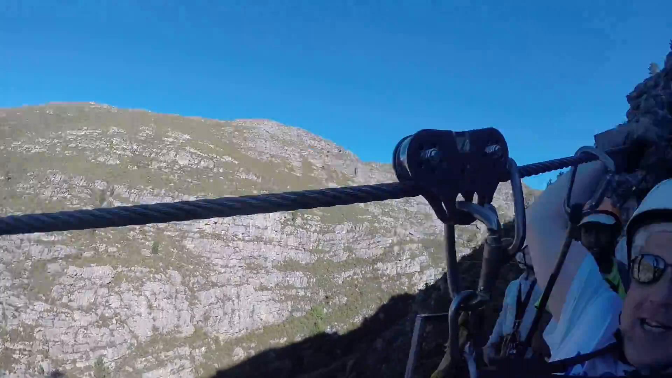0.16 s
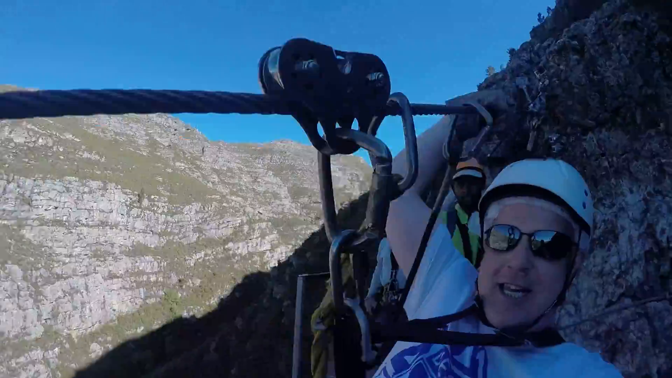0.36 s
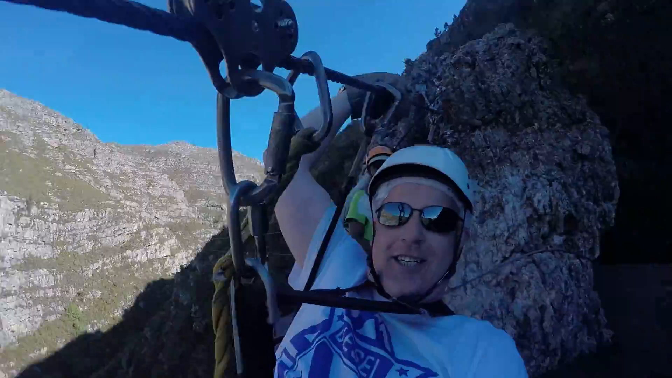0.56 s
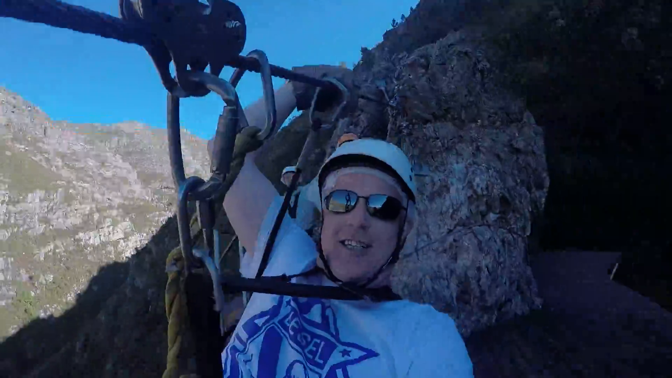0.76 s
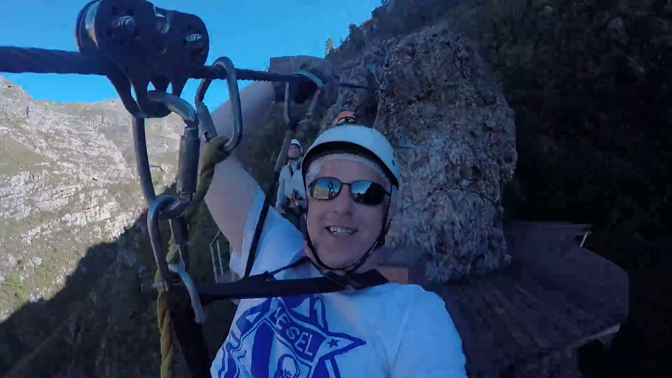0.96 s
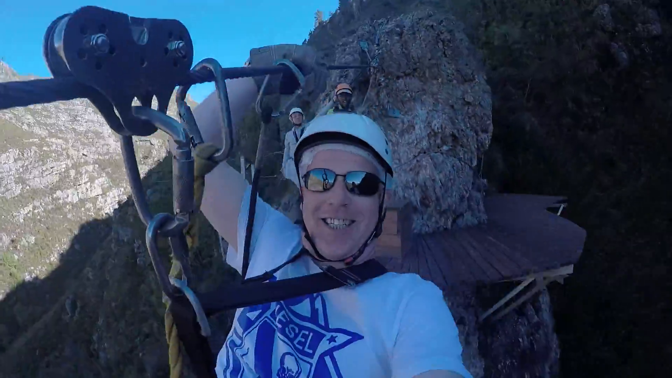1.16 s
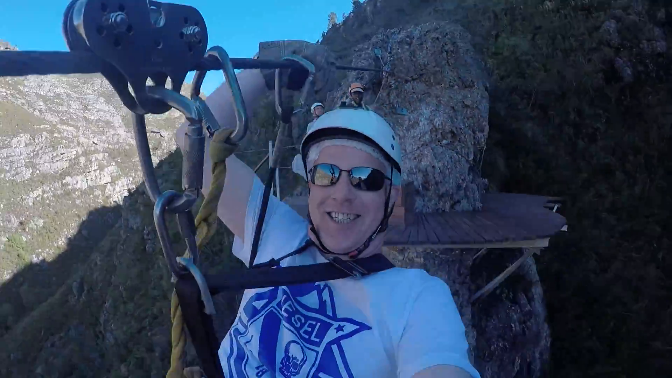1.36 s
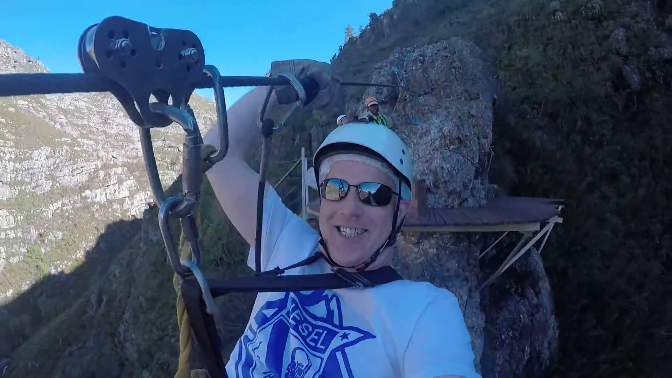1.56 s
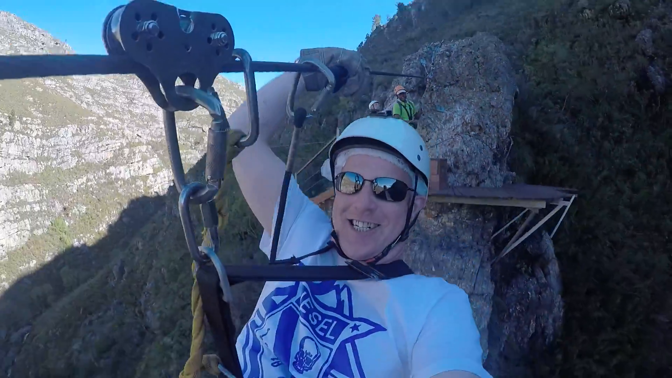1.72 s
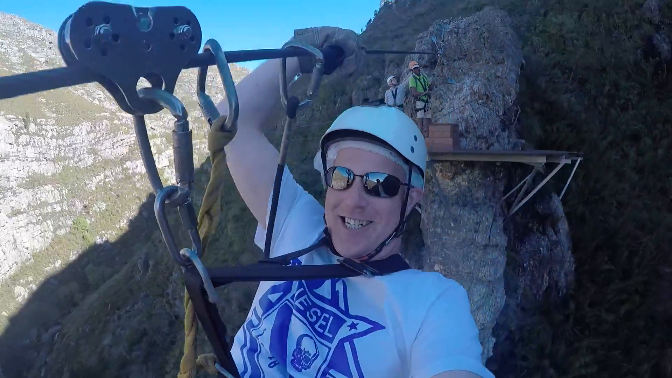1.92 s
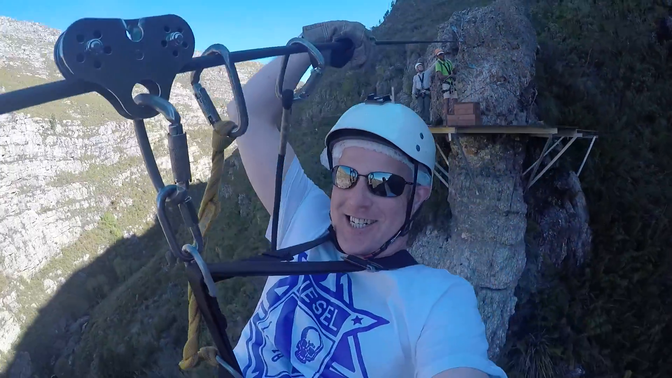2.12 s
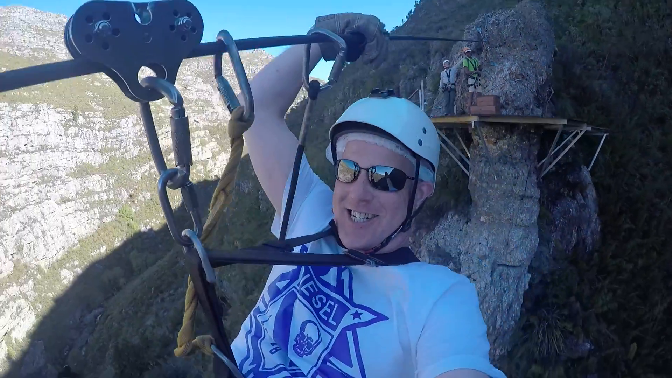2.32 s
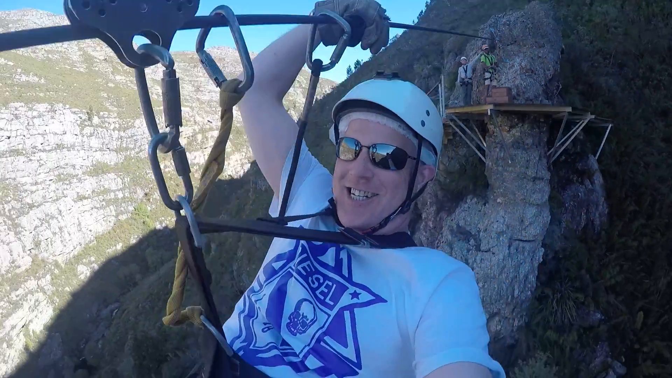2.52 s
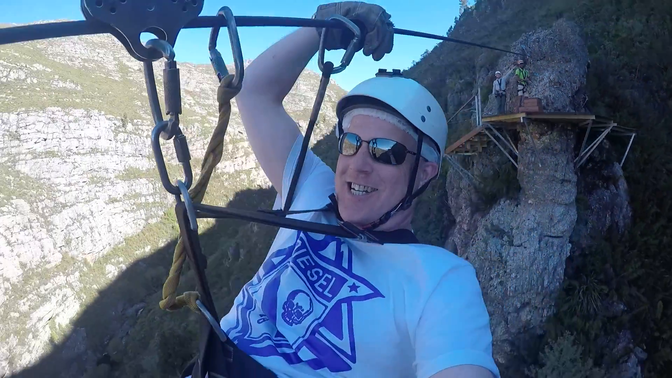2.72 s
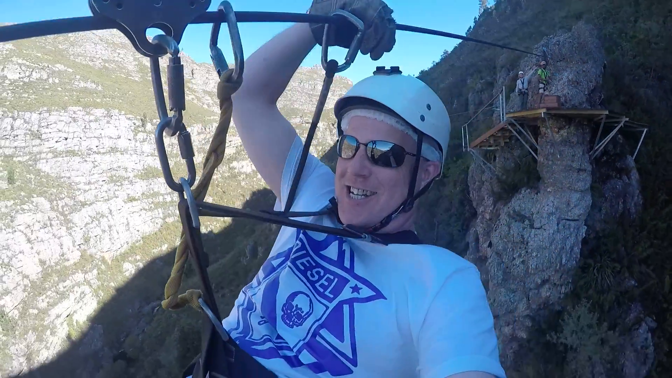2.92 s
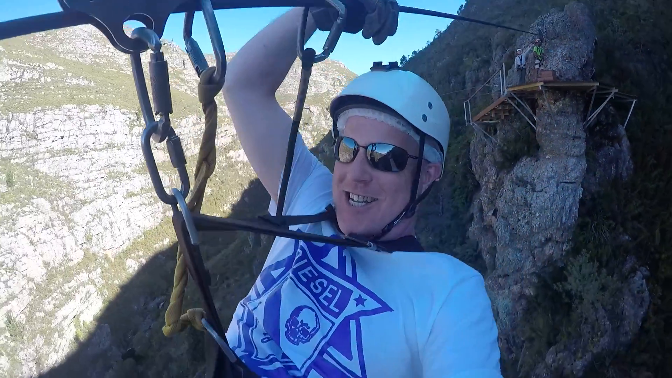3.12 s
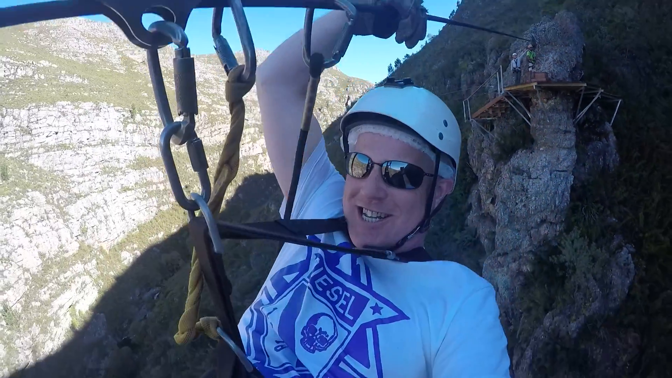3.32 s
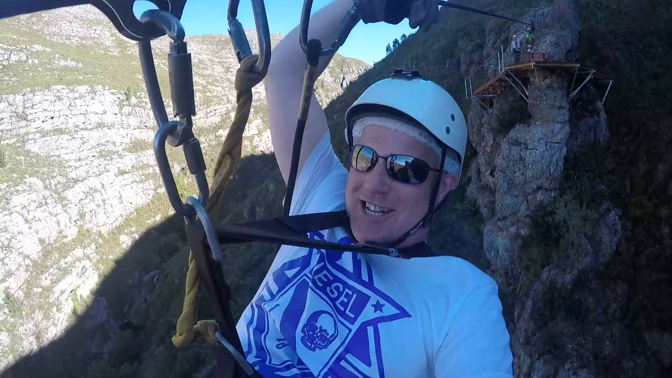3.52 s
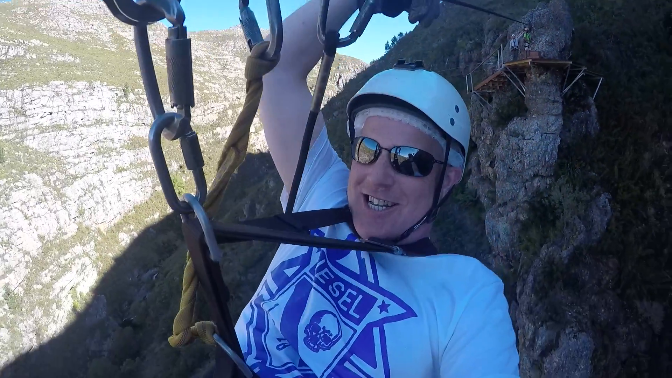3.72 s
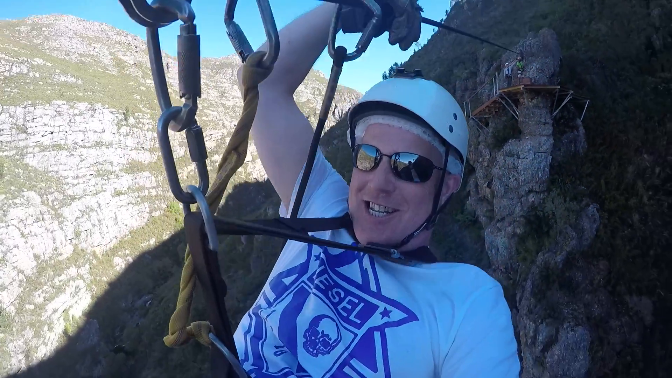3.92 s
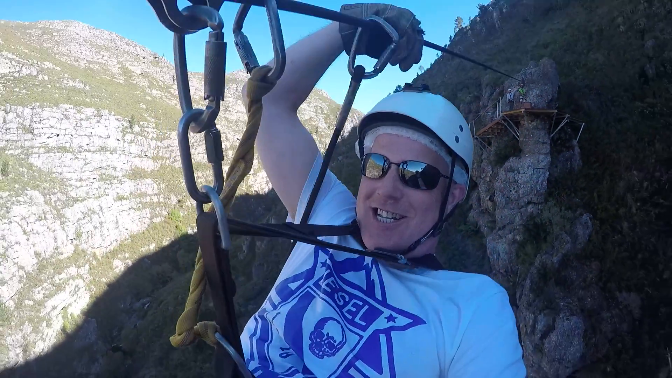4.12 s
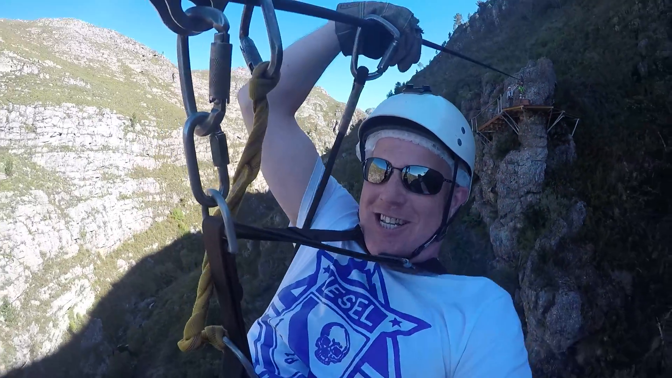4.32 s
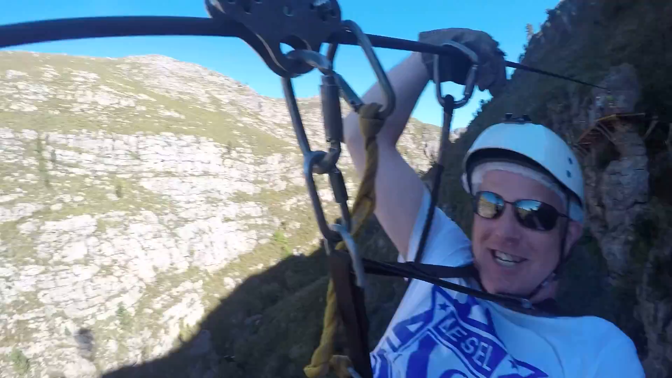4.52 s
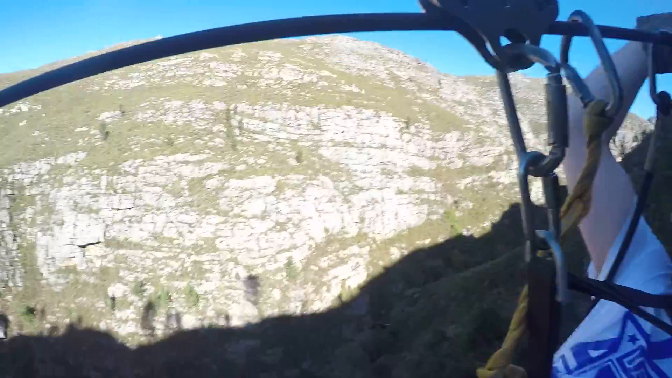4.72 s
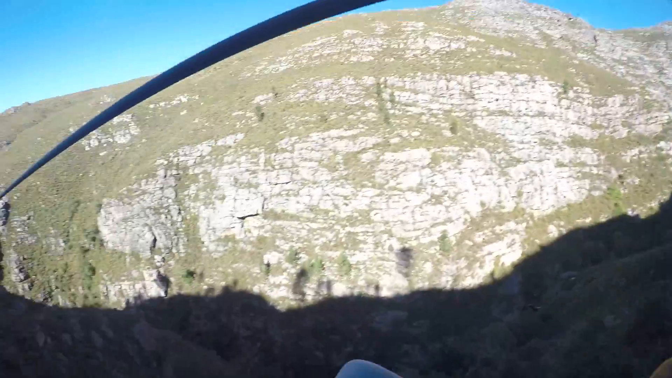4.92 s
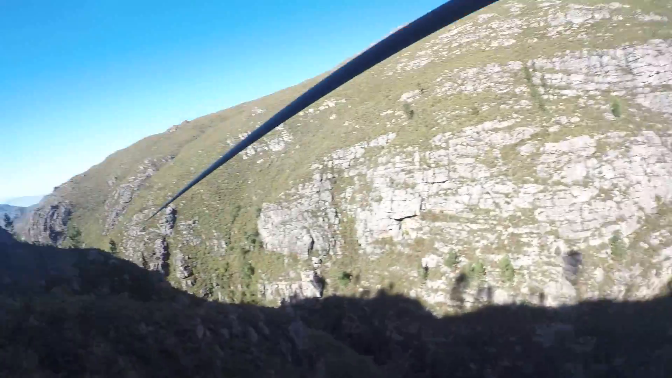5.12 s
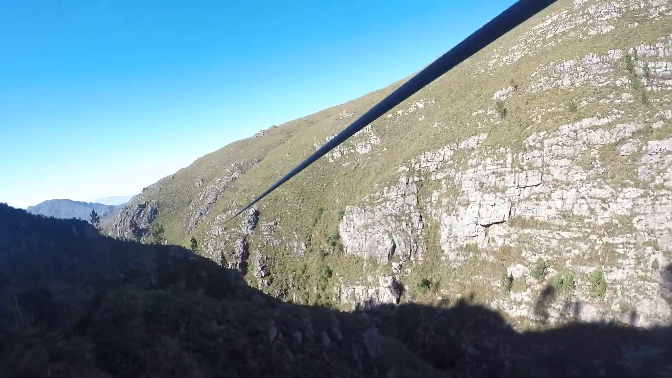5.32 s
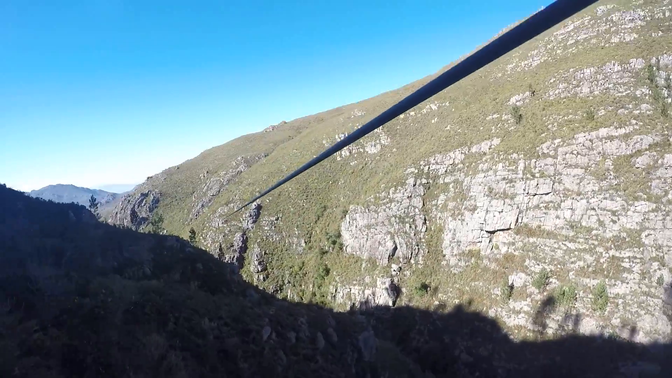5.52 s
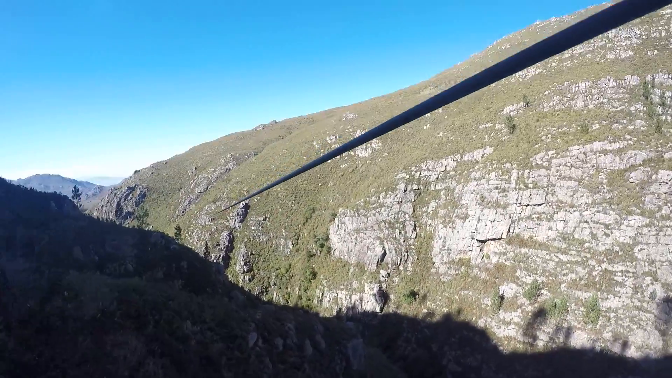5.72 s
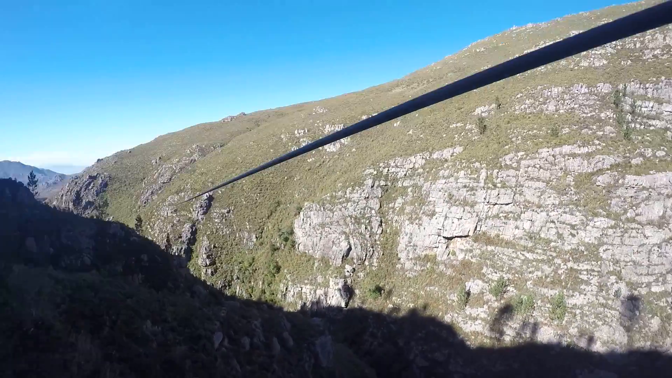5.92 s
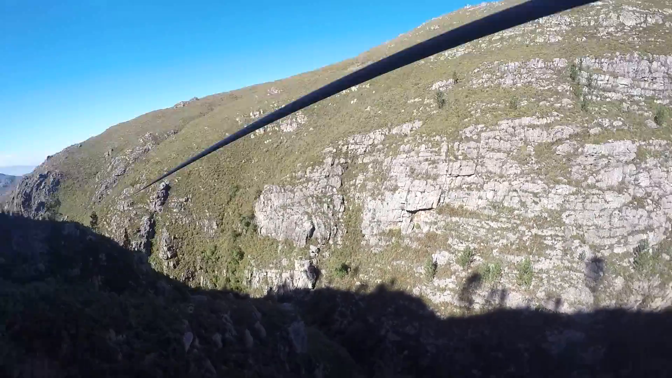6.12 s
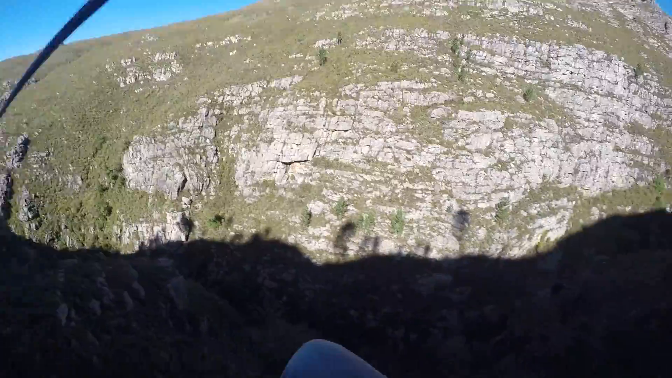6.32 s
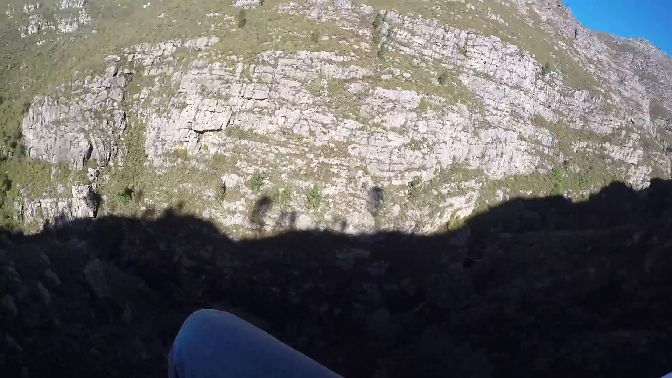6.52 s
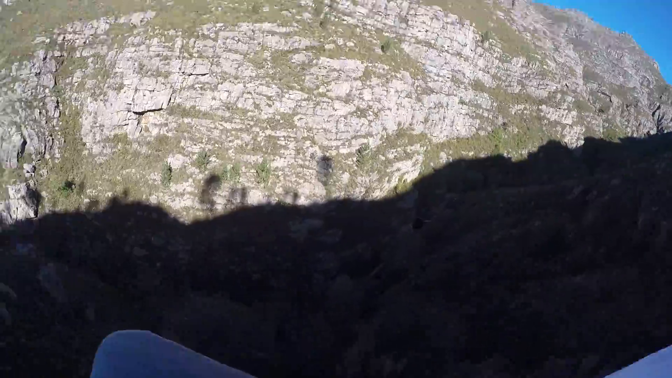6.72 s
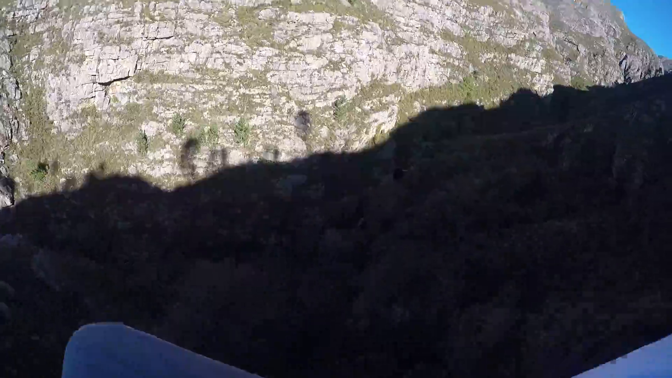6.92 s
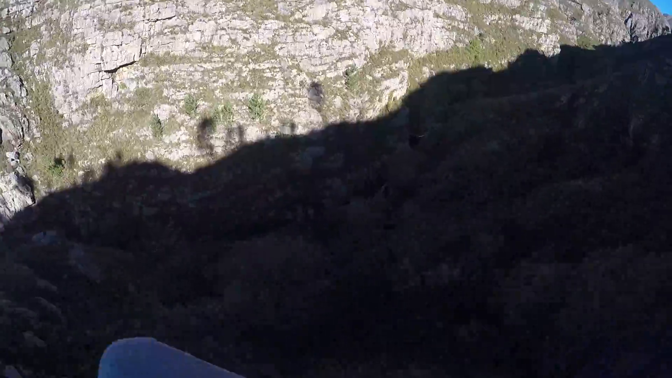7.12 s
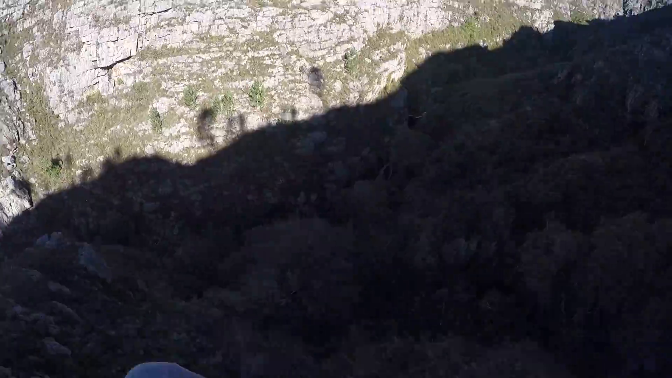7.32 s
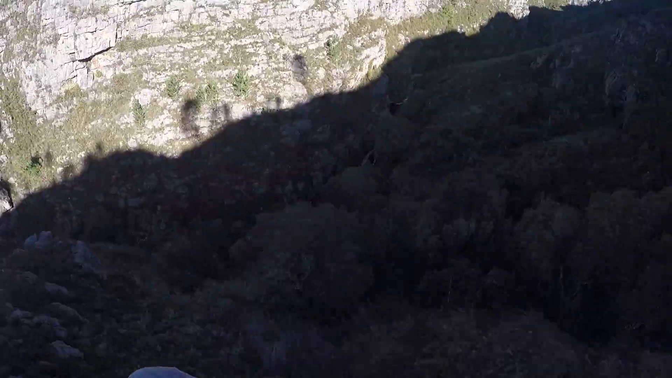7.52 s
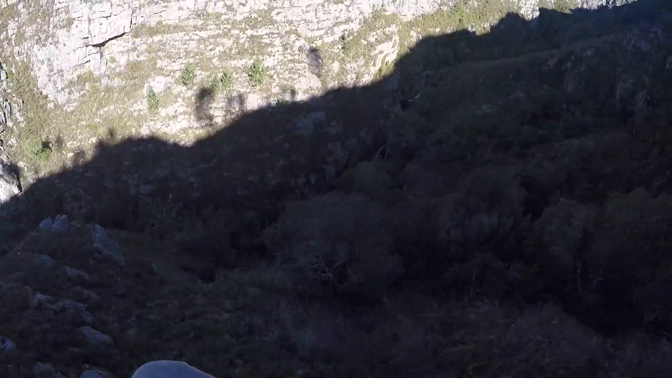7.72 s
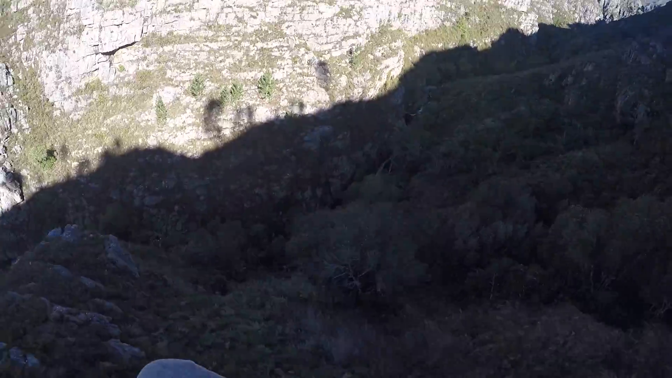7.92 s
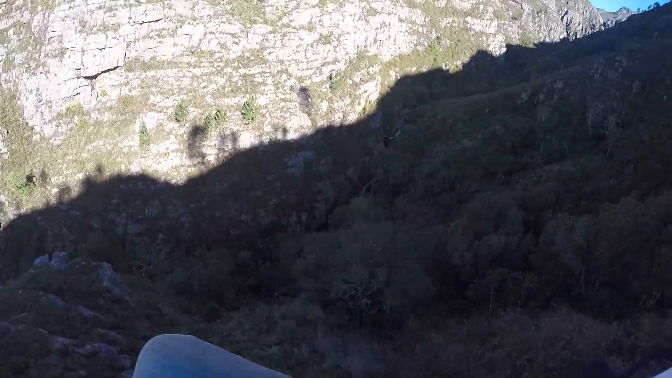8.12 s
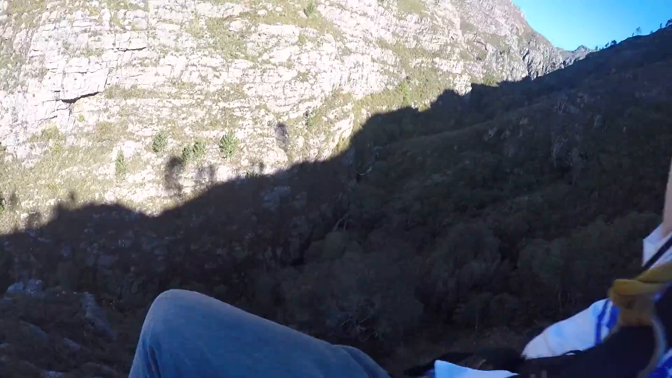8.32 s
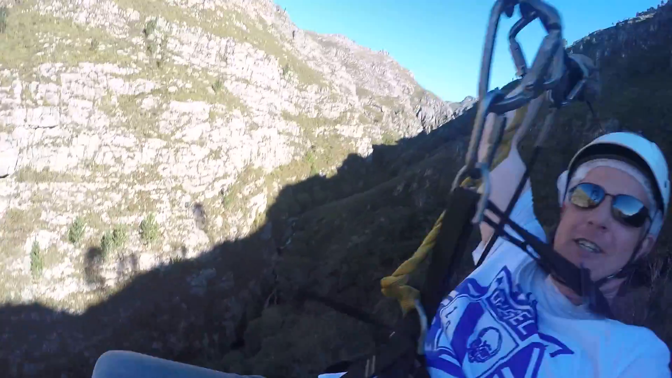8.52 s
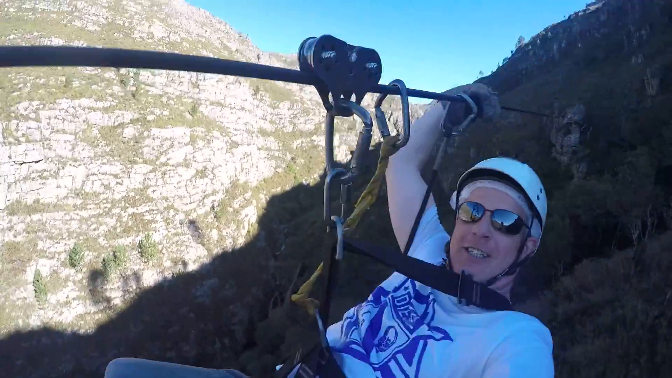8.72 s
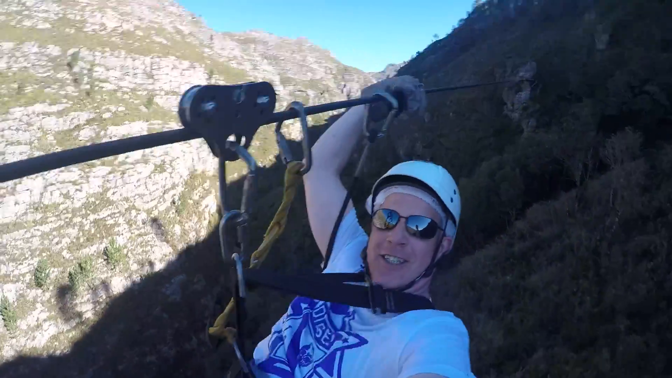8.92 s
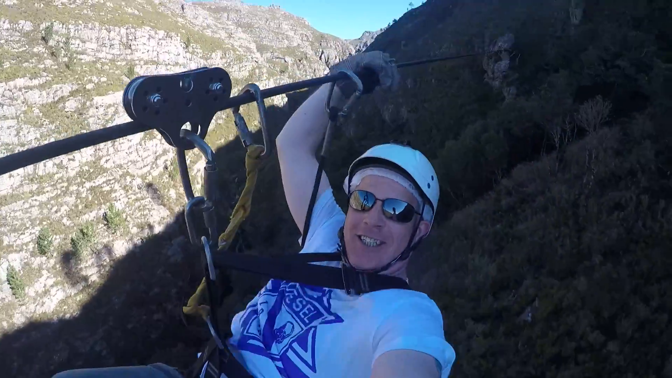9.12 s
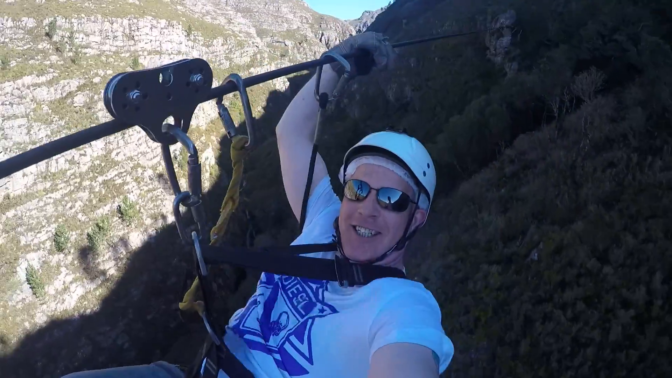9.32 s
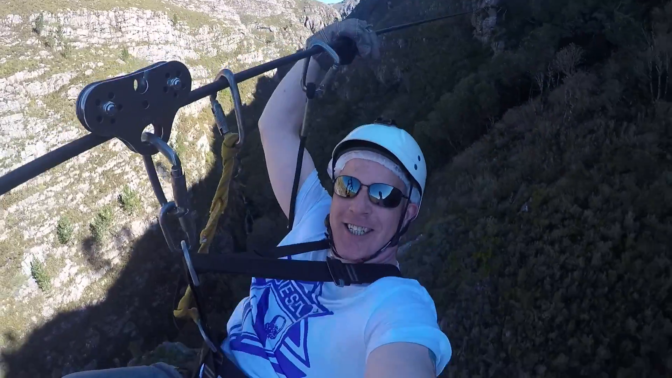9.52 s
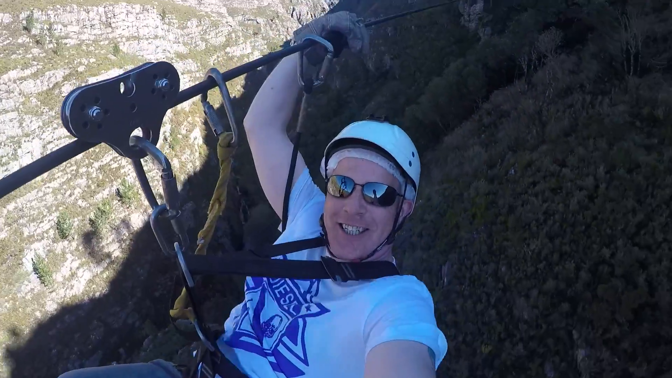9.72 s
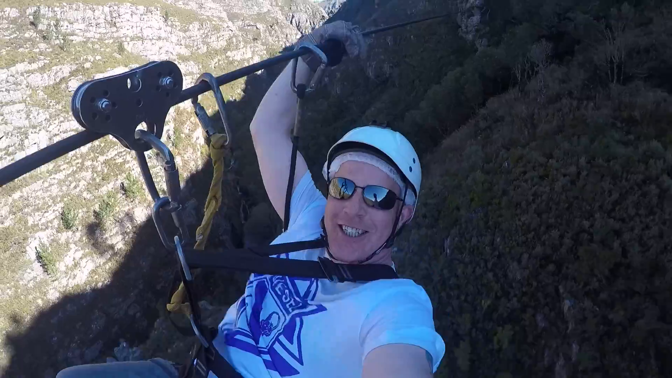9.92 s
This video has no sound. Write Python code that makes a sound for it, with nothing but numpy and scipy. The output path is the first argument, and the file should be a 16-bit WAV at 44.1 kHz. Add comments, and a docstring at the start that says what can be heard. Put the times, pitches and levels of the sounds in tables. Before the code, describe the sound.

A metal pulley trolley ticks off slowly along a steel cable, then accelerates into a loud, gritty, steadily rising metallic whine with low wind buffeting.

```python
"""Cable trolley over a gorge

A pulley trolley gathers speed along a steel cable, heard by a hand-held camera in a case.
Wheels tick over the cable's strands until the ticks fuse into a rising whine; contact noise is shaped by
the trolley's metal resonances, and the colour changes as the camera is swung round.
Shaped noise and a low gliding tone make the wind on the case; dying sines make the finger knocks,
and slow fading swings the pushes."""
import sys
import numpy as np
from scipy import signal
from scipy.fft import rfft, irfft
from scipy.io import wavfile
from scipy.ndimage import uniform_filter1d

SR = 44100
rng = np.random.default_rng(int(sys.argv[2]) if len(sys.argv) > 2 else 0)


def bounce(signal):
    """Save signal as a 16-bit WAV file at the path given by the first command-line argument."""
    frames = np.transpose(np.atleast_2d(signal))
    limited = np.clip(frames, -1, 1)
    pcm = np.round(limited * 32767).astype(np.int16)
    wavfile.write(sys.argv[1], SR, pcm)


N = 439236

# Speed over the cable, a jerky push-off then a flattening gain, rippled by the rider's swing:
# [t/s, strand rate/Hz]
STRAND_RATE = [(0.0, 43.8), (0.1, 46.5), (0.17, 45.3), (0.22, 61.9), (0.25, 69.3), (0.285, 55.7),
               (0.32, 67.8), (0.355, 90.0), (0.41, 75.3), (0.46, 103.2), (0.6, 111.0), (0.9, 158.0),
               (1.5, 226), (2.1, 302.5), (2.7, 377.5), (3.05, 405.5), (3.75, 490.7), (4.05, 522),
               (4.35, 543.6), (5.3, 638.5), (6, 687), (6.72, 747.5), (6.93, 751.5), (7.35, 786), (7.8, 807),
               (8.1, 826.5), (8.7, 848.7), (8.9, 864.5), (9.1, 869), (9.32, 869), (9.6, 890), (9.96, 891)]
# Loudness of the rolling trolley: [t/s, level/dB]
ROLLING_LEVEL = [(0.0, -36.5), (0.08, -44.5), (0.36, -34), (1.19, -19.5), (1.39, -18), (1.69, -20.5),
                 (2.38, -16.5), (2.66, -18), (3.63, -15.5), (4.08, -18), (4.13, -15.5), (6.27, -17),
                 (6.52, -18), (6.88, -15.5), (8.49, -18), (8.57, -15), (8.93, -16), (9.02, -14.5),
                 (9.13, -15.5), (9.96, -16)]
# Trolley resonances: [f/Hz, nominal width/Hz, then level/dB at each of seven camera aims]
TROLLEY_MODES = [(1500, 286, 2, 2, -2, -1, -35, -6, -8), (1740, 241, -1, 1, -1, -2, 2, -6, -3),
                 (2290, 488, 2, 0, -4, -20, -6, -8, -7), (2550, 140, 9, 0, 2, -1, -8, 0, 1),
                 (2810, 57, 7, 10, 5, 10, 1, 3, -7), (2910, 86, 9, 6, 9, 7, 12, 4, 5),
                 (3340, 240, -3, -6, -1, 2, 4, 3, -18), (3560, 170, 0, -5, 4, 2, -7, 2, -3),
                 (3890, 102, 9, 10, 4, 6, -2, 9, 8), (3980, 60, 15, 17, 16, 12, 15, 12, 18),
                 (4200, 197, 7, 8, 4, -8, 11, 6, 7), (4440, 179, -1, -1, -2, -9, -35, 4, 11),
                 (4810, 84, 10, 12, 10, 10, 2, 3, 10), (5140, 400, 3, 0, 2, 3, 1, 3, 0),
                 (5870, 694, 0, -4, 0, -12, -3, 1, -3), (6760, 400, -5, -4, -4, -3, 0, 0, -1),
                 (7130, 157, -2, 1, 5, -6, 10, 2, -1), (7460, 432, 2, -1, 5, 1, -7, 4, -3),
                 (8450, 613, -3, -5, -2, -35, -13, -1, -11), (9430, 430, -1, -2, -4, 6, -7, 0, -7),
                 (9670, 241, -35, -35, -10, 10, -7, 1, -3), (9870, 300, 2, 0, -4, 0, -35, 2, -6),
                 (10220, 98, -14, -11, -2, 4, -3, 3, -6), (10450, 200, -35, -24, -12, -2, -2, -1, -18),
                 (10740, 120, -1, -6, 5, 5, -6, 5, -12), (11260, 200, -7, -8, -17, -18, -9, -6, -16),
                 (11890, 200, -10, -18, -15, -14, -9, -10, -20),
                 (12540, 200, -4, -8, -5, -15, -6, -11, -10), (12890, 143, -7, -9, -10, -12, -14, -15, -14),
                 (13210, 250, -7, -9, -8, -11, -6, -9, -10), (13600, 160, -7, -6, 0, -2, -9, -9, -8),
                 (14220, 500, -11, -10, -13, -9, -9, -10, -15),
                 (14980, 306, -17, -17, -19, -18, -14, -12, -22)]
# Where the camera points; fractions blend neighbouring aims: [t/s, aim 0 to 6]
CAMERA_AIM = [(0, 0), (.9, 0), (1.4, 1), (4.48, 1), (4.62, 2), (4.86, 2), (5, 3), (6.5, 3), (6.76, 4),
              (8.14, 4), (8.32, 5), (8.58, 5), (8.78, 6), (9.96, 6)]
# Strength of the strand ticks, distinct only at walking pace: [t/s, level/dB]
TICK_LEVEL = [(0, -30), (.1, -35), (.25, -28.5), (.45, -23), (.6, -42), (1, -49), (1.5, -49), (9.96, -90)]
# Ring of one tick: [f/Hz, level/dB, t60/s]
TICK_MODES = [(2600, -5.5, 0.043), (4000, -23, .03), (5180, -3, 0.0089), (9000, -20, 0.0055)]
# Wind on the case between gusts: [t/s, buffet level/dB, flap level/dB, rush level/dB]
WIND_LEVELS = [(0, -31, -61, -45.5), (.2, -40.5, -55, -62.5), (1.3, -44.5, -56.5, -56.5),
               (2.3, -43.5, -52, -53.5), (2.9, -44.5, -47.5, -51.5), (4.4, -41.5, -42, -49),
               (6.2, -40.5, -41.5, -48.5), (6.9, -44.5, -48, -51), (7.9, -45.5, -43.5, -50),
               (8.45, -43, -42, -42), (9.1, -38.5, -47, -45), (9.96, -39, -37.5, -42.5)]
# Spectra of the three wind layers, relative density: [f/Hz, level/dB per Hz]
BUFFET_SPECTRUM = [(10, -35), (15, 7.5), (42, -0.5), (70, -12), (140, -40), (250, -70)]
FLAP_SPECTRUM = [(30, -14), (60, 6), (80, 0.5), (130, -1.5), (220, -15.5), (400, -29), (700, -57)]
RUSH_SPECTRUM = [(120, -18), (200, -1), (370, -7.5), (608, -7), (669, -5), (792, -4), (1000, -3),
                 (1150, -11.5), (1500, -1.5), (2530, -120)]
# Low moan in the wind: [t/s, level/dB, f/Hz]
MOAN_GLIDE = [(9.55, -59, 69.3), (9.7, -33, 70.7), (9.85, -29.5, 80.5), (9.91, -46, 75.2),
              (9.96, -26, 67.8)]
# Finger knocks on the case: [t/s, nominal level/dB, lift of the upper modes/dB]
CASE_KNOCKS = [(0.02, -21.5, -18), (0.123, -49, -9), (0.139, -44, -11), (0.253, -38.5, -20),
               (0.463, -56, 11), (0.499, -49.5, 13), (0.605, -40.5, 0), (0.629, -41, 1), (0.656, -40, -10),
               (0.737, -53, -6), (0.804, -54, 11), (1.131, -49, -8), (4.485, -36.5, 6), (4.516, -44, -2),
               (4.566, -48, 10)]
# Ring of the plastic case, main mode first: [f/Hz, level/dB, t60/s]
CASE_MODES = [(482, -1, .05), (600, 0, .02), (730, 4, .018), (860, 3, .02)]
# Soft pushes on the case: [t/s, nominal level/dB, length of one half-swing/s]
CASE_PUSHES = [(0.485, -17, 0.019), (0.528, -26, 0.021), (0.568, -22, 0.027), (4.687, -23, 0.017),
               (9.598, -24, 0.015)]
# Fainter tones in the wheel contact, mostly sidebands between the whine's multiples as the wheels turn:
# [multiple of strand rate, level/dB before the high-tone fade]
SIDE_TONES = [(1.73, -28), (1.87, -30), (2.13, -30), (2.27, -28), (2.33, -30), (2.73, -32), (3.4, -27),
              (3.73, -28), (4.27, -26), (4.41, -27), (4.59, -24), (5, -25), (5.25, -25), (5.43, -25),
              (6, -25)]
# Parts of the ringing that swell or sink for a moment, against the rest:
# [t/s, f/Hz, lift/dB, length/s, width/Hz]
RING_SWELLS = [(.17, 3960, 3, .03, 500), (.46, 4000, -3, 0.036, 500), (1.503, 7600, 3, 1.5, 4000),
               (2.097, 4830, 0, 1.2, 200), (3.51, 2810, 10, .18, 90), (4.45, 4025, 5.5, 0.68, 200),
               (4.83, 7250, 8, 0.098, 500), (6.195, 4800, 2.5, .5, 300), (6.25, 2900, -5.5, 0.7, 200),
               (6.554, 3650, 12, 0.078, 400), (6.665, 3700, 11.5, 0.099, 500), (7.75, 8700, -2, 0.54, 1390),
               (8.315, 9900, 5, 0.23, 1200), (8.49, 10800, 5, 0.06, 1200), (8.576, 7400, 5, .12, 1200),
               (8.723, 4370, -8, 0.37, 400), (8.67, 4820, 16, 0.14, 130), (8.82, 4760, 3, 0.21, 130),
               (8.91, 7660, 11.5, 0.26, 800)]
# Gusts, some as the camera swings: [t/s, length/s, buffet lift/dB]
WIND_GUSTS = [(0.263, 0.27, 11.5), (0.536, 0.18, 15), (0.894, 0.56, 9.5), (1.235, 0.13, 8.5),
              (3.27, 0.33, 4), (4.695, 0.13, 15.5), (5.05, 0.82, 7.5), (6.612, 0.47, 6), (7, .2, 7),
              (8.47, .4, 8), (8.957, .25, 10.5)]
# What a tone keeps on its way from the wheels into the case: [f/Hz, level/dB]
PATH_RESPONSE = [(300, -87), (650, -66), (800, -69.5), (1000, -57), (1130, -48), (1280, -32.5),
                 (1420, -29.5), (1520, -30.5), (1640, -29.5), (1780, -28), (1870, -36), (2050, -46),
                 (2250, -31.5), (2450, -40.5), (2560, -31), (2700, -36), (2950, -27), (3120, -40),
                 (3350, -32), (3520, -42)]
# Whine balance: [multiple of strand rate, then lift/dB at each of seven camera aims]
WHINE_BALANCE = [(1, 15, 9, 9, 9, 14.5, 6, -1), (2, -5, 0, -6, -0.5, 5, -1, -1.2),
                 (3, -5, 0.5, -5, -1, 0.5, 2.5, 1.5), (4, -6, -6, -3, -0.5, 1, 2.5, 3)]
# Moments when the whine falters: [t/s, length/s, dip/dB]
WHINE_DIPS = [(4.05, 0.14, -6), (6.58, 0.23, -8.5), (8.55, 0.5, -2)]

FLAP_SHARE, RUSH_SHARE = 0.3, 0.25  # share of a gust's dB lift that reaches the higher layers
PORT_HZ = 1300  # the case shuts out the trolley's noise and ticks below this
CASE_LOW_HZ = 400  # the small case radiates little of a knock below this
EDGE_HZ = 15350  # top of the audible band
FRAME = dict(nperseg=2048, noverlap=1536)  # samples, for moving spectra


def gain_of(db):
    """Decibels to amplitude."""
    return 10 ** (np.asarray(db) / 20)


def evened(x):
    """Scales to rms 1."""
    return x / np.sqrt(np.mean(x ** 2) + 1e-20)


def curve(rows, t=None):
    """Every column of a table, joined by straight lines in time."""
    s, *columns = np.transpose(rows)
    at = np.arange(N) / SR if t is None else t
    return np.array([np.interp(at, s, column) for column in columns])


def wander(hz, count=1):
    """Slow random drift of rms near 1: about hz fresh values a second, smoothed and joined by lines."""
    knots = rng.standard_normal((count, int(3 * hz * N / SR) + 2))
    knots = uniform_filter1d(knots, size=3)
    at = np.linspace(0, knots.shape[1] - 1, N)
    return np.array([np.interp(at, np.arange(len(k)), evened(k)) for k in knots])


def bumps(rows):
    """Sum of bell-shaped rises and dips in dB, one for each row."""
    t = np.arange(N) / SR
    return sum(db * np.exp(-(2 * (t - s) / length) ** 2) for s, length, db in rows)


def blend(aim, columns):
    """Reads one value per row at every moment, crossfading between camera aims."""
    low = np.minimum(aim.astype(int), columns.shape[1] - 2)
    return columns[:, low] * (1 + low - aim) + columns[:, low + 1] * (aim - low)


def coloured(points):
    """Steady noise of rms 1 with the given spectrum."""
    hz, db = np.transpose(points)
    bins = np.fft.rfftfreq(N, 1 / SR)
    shape_db = np.interp(np.log(bins + 1), np.log(hz + 1), db, left=-90, right=-90)
    return evened(irfft(rfft(rng.standard_normal(N)) * gain_of(shape_db), N))


def tones(turns, level_db, phase_shake, shake_db):
    """Sines that follow the given turns, each a little unsteady in phase (radians) and level."""
    shake = wander(14.6, count=2 * len(turns))
    phase = np.float32(2 * np.pi * (turns % 1) + phase_shake * shake[::2])
    gain = gain_of(np.float32(level_db + shake_db * shake[1::2]))
    return np.sqrt(2) * (gain * np.sin(phase)).sum(0)


def ring(modes, lift_db=0):
    """Sum of dying sines after one blow."""
    hz, db, t60 = np.transpose(modes)[:, :, None]
    t = np.arange(6000) / SR
    decay = gain_of(db + lift_db - 60 * t / t60)
    return (decay * np.sin(2 * np.pi * hz * t)).sum(0)


def highpass(x, order, hz):
    """Removes what lies below hz."""
    return signal.sosfilt(signal.butter(order, hz, "high", fs=SR, output="sos"), x)


def add(mix, s, sound):
    """Mixes a sound in at s seconds."""
    part = mix[round(s * SR):][:len(sound)]
    part += sound[:len(part)]


def wind():
    """Turbulent air as noise layers: lumpy low buffeting, flapping above it, a thin rush; and one moan."""
    gust_share = [1, FLAP_SHARE, RUSH_SHARE]
    buffet_db, flap_db, rush_db = curve(WIND_LEVELS) + np.outer(gust_share, bumps(WIND_GUSTS))
    buffet = gain_of(buffet_db) * coloured(BUFFET_SPECTRUM)
    flap = gain_of(flap_db + 3.5 * wander(21)[0]) * coloured(FLAP_SPECTRUM)
    rush = gain_of(rush_db + 1.1 * wander(30)[0]) * coloured(RUSH_SPECTRUM)
    b, a = signal.iirpeak(CASE_MODES[0][0], 12., SR)  # the rush makes the case hum at its main mode
    rush = rush + 0.7 * signal.lfilter(b, a, rush)
    moan_db, moan_hz = curve([(0, -87, 59)] + list(MOAN_GLIDE))
    moan_phase = 2 * np.pi * np.cumsum(moan_hz) / SR
    moan = gain_of(moan_db + 2.0 * wander(25)[0]) * np.sin(moan_phase)
    return buffet + flap + rush + np.sqrt(2) * moan


def wheel_contact(turns, rate):
    """Gritty noise, pulsed by the strands at low speed, with faint tones locked to the strand rate."""
    pulsed = np.exp(-rate / 130) * 4.0 * np.exp(-(turns % 1) / .18)
    steady = 0.91 * (1 - np.exp(-rate / 70))
    grit_db = .5 * wander(25)[0] + .8 * wander(250)[0]
    noise = (steady + pulsed) * gain_of(grit_db) * rng.standard_normal(N)
    multiple, tone_db = np.transpose(SIDE_TONES)[:, :, None]
    # high tones drown: 2 dB less per octave above 2200 Hz
    fade_db = -2.0 * np.log2(np.maximum(multiple * rate / 2200, 1))
    return noise + tones(multiple * turns, tone_db + fade_db, phase_shake=.4, shake_db=2.2)


def trolley_power(hz, aim):
    """Power response of the trolley's resonances through the case; each resonance flutters alone."""
    centre, width, *heard_db = np.transpose(TROLLEY_MODES)
    power = blend(aim, gain_of(heard_db).T ** 2)
    flutter = evened(uniform_filter1d(rng.standard_normal(power.shape), size=5))
    off = (2 * (hz[:, None] - centre) / width) ** 2
    peaks = 1 / (1 + off) / (1 + off / 9)
    port = 1 / (1 + (PORT_HZ / (hz + 1)) ** 12.)
    return port[:, None] * (peaks @ (power * gain_of(0.51 * flutter) ** 2))


def ringing_colour(hz, t, aim):
    """Finer colour in dB: a comb of small modes, drifting treble and momentary swells."""
    # countless small modes of plates, links and cable: part steady, part changing with the aim
    comb = uniform_filter1d(rng.standard_normal((len(hz), 8)), size=2, axis=0)
    comb_db = 2.2 * np.clip(hz / 5000, .3, 1)[:, None] * (comb[:, :1] + blend(aim, comb[:, 1:]))
    # the hand sways, so broad patches drift, faster in the swings through aims 2 and 5
    sway = uniform_filter1d(rng.standard_normal((2, len(hz), len(t))), size=40, axis=1)
    slow = evened(uniform_filter1d(sway[0], size=50))
    fast = evened(uniform_filter1d(sway[1], size=6))
    swinging = uniform_filter1d(np.isin(np.round(aim), (2, 5)) * 1., size=9)
    colour_db = comb_db + 1.0 * slow + 2.0 * swinging * fast
    for s, swell_hz, db, length, span in RING_SWELLS:
        in_pitch = np.exp(-(2 * (hz - swell_hz) / span) ** 2)
        in_time = np.exp(-(2 * (t - s) / length) ** 2)
        colour_db += db * np.outer(in_pitch, in_time)
    return colour_db


def rolling(turns, rate):
    """Wheel contact shakes the trolley, whose resonances colour it; then the level curve sets loudness."""
    hz, t, spectrum = signal.stft(wheel_contact(turns, rate), SR, **FRAME)
    aim = curve(CAMERA_AIM, t)[0]
    power = trolley_power(hz, aim) * gain_of(2 * ringing_colour(hz, t, aim))
    filtered = spectrum * np.sqrt(power / power.mean(0))
    sound = signal.istft(filtered, SR, **FRAME)[1][:N]
    steady = sound / np.sqrt(uniform_filter1d(sound ** 2, size=8000) + 1e-12)
    return gain_of(curve(ROLLING_LEVEL)[0]) * steady


def handling():
    """Knocks ring the plastic case; pushes rock it in a few fading low swings."""
    out = np.zeros(N)
    upper = (np.transpose(CASE_MODES)[0] > 680)[:, None]
    scuffs = rng.standard_normal((len(CASE_KNOCKS), 400))
    scuffs = uniform_filter1d(scuffs, size=12) * np.hanning(400)
    for (s, db, upper_db), scuff in zip(CASE_KNOCKS, scuffs):
        finger = np.r_[np.hanning(40) / 20, .09 * scuff]  # a soft blow, then the skin drags a little
        add(out, s, gain_of(db) * np.convolve(ring(CASE_MODES, upper * upper_db), finger))
    out = highpass(out, 3, CASE_LOW_HZ)
    for s, db, length in CASE_PUSHES:
        u = np.arange(round(5 * length * SR)) / (length * SR)  # time in half-swings
        onset = np.sin(np.pi / 2 * np.minimum(3 * u, 1)) ** 2
        swing = np.sin(np.pi * (u - .15)) * np.exp(-.8 * u)
        add(out, s, -gain_of(db) * swing * onset)
    return out


def ticks(turns):
    """One short metallic ring for each strand, uneven in strength, with a loose rattle after it."""
    crossed = np.diff(np.floor(turns), prepend=1) * (turns > .5) > 0
    chance = 500 / SR * np.exp(-(turns % 1) / .4)  # up to 500 rattles a second, thinning after each strand
    rattle = gain_of(-5.0) * (rng.random(N) < chance) * rng.choice([-1, 1], N)
    strength_db = curve(TICK_LEVEL)[0] + 2.2 * rng.standard_normal(N)
    blows = (crossed + rattle) * gain_of(strength_db)
    return highpass(signal.oaconvolve(blows, ring(TICK_MODES))[:N], 4, PORT_HZ)


def whine(turns, rate):
    """The strand rate and its first multiples sing clearly, loud where they cross a pass band of the path."""
    balance = np.array(WHINE_BALANCE)
    multiple, lifts_db = balance[:, :1], balance[:, 1:]
    hz, db = np.transpose(PATH_RESPONSE)
    path_db = np.interp(np.log(multiple * rate), np.log(hz), db)
    level_db = path_db + blend(curve(CAMERA_AIM)[0], lifts_db) + bumps(WHINE_DIPS)
    return tones(multiple * turns, level_db, phase_shake=.4, shake_db=1.8)


def scene():
    """All sources at one microphone; the open gorge returns nothing audible."""
    rate = curve(STRAND_RATE)[0]
    turns = np.cumsum(rate) / SR - .22  # strands passed so far
    sound = wind() + rolling(turns, rate) + handling() + ticks(turns) + whine(turns, rate)
    return sound[None]


def record(dry):
    """Band limit: a steep low-pass at the top edge."""
    lowpass = signal.firwin(511, EDGE_HZ, window=("kaiser", 9), fs=SR)
    return signal.oaconvolve(dry, lowpass[None], "same")


dry = scene()
out = record(dry)
bounce(out)
```